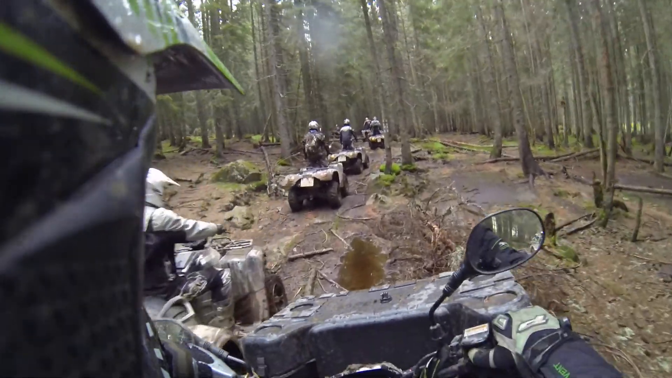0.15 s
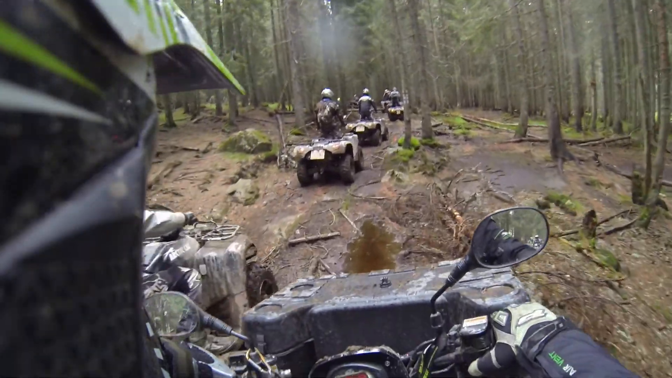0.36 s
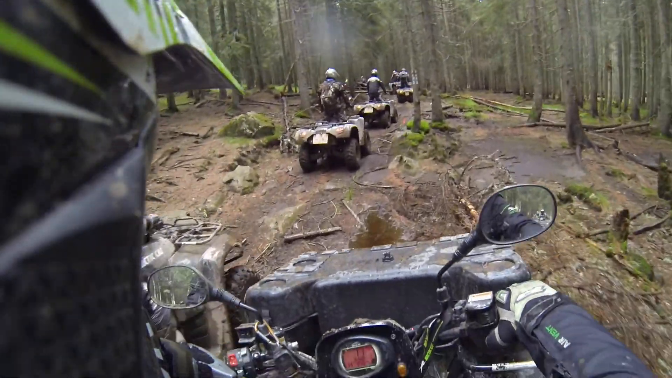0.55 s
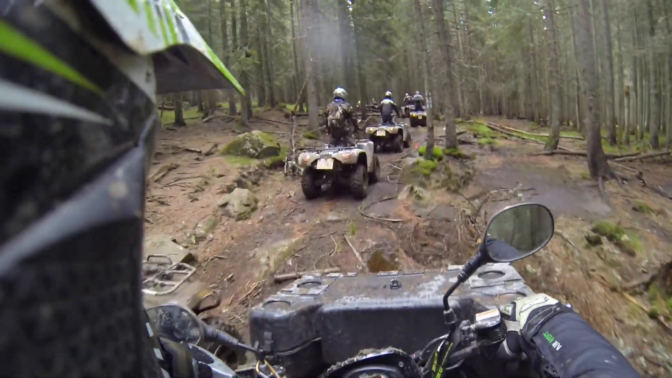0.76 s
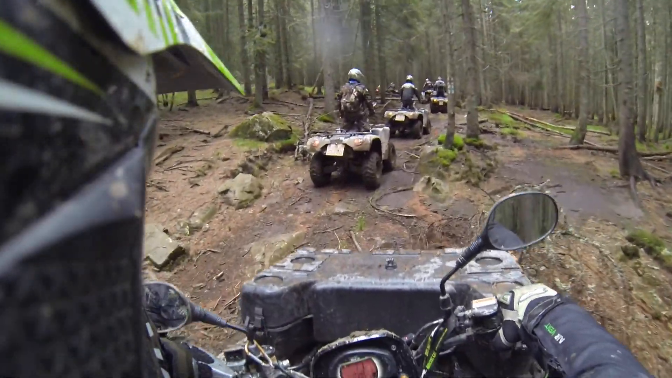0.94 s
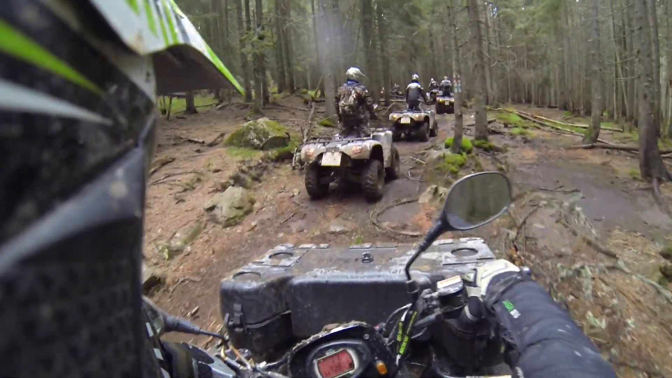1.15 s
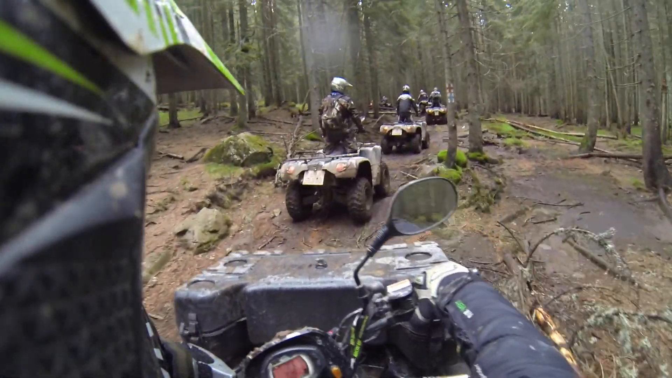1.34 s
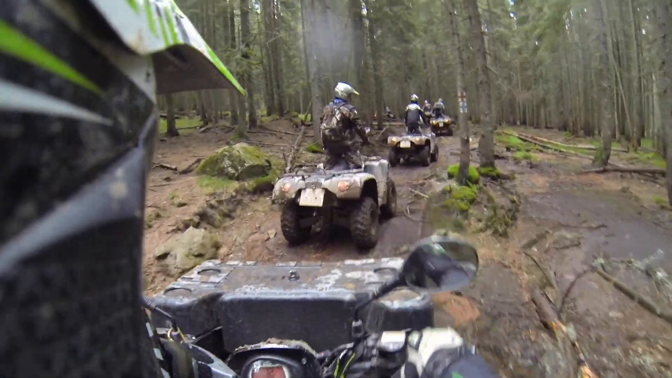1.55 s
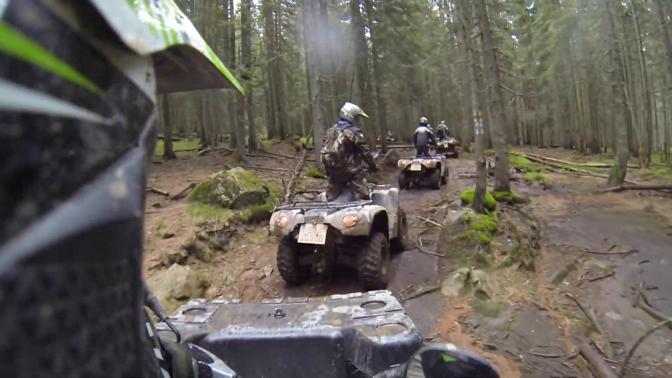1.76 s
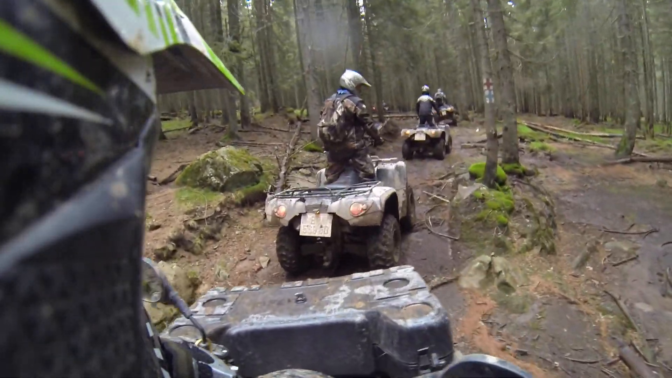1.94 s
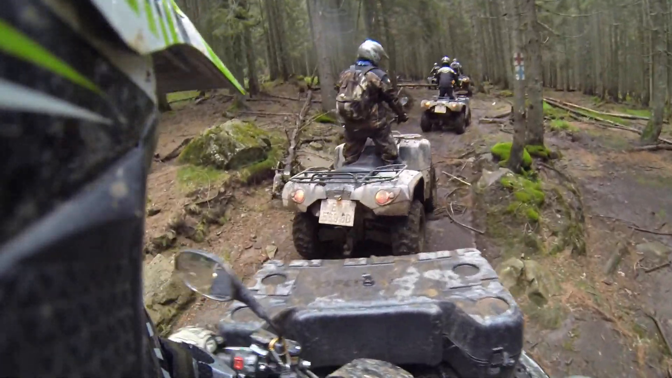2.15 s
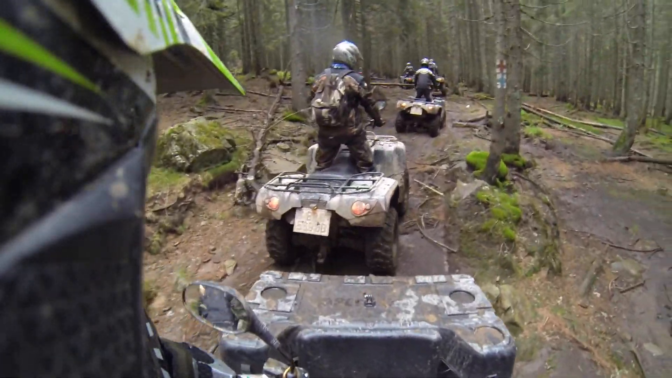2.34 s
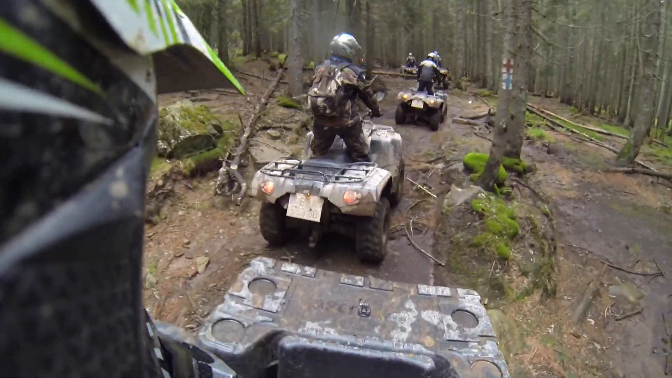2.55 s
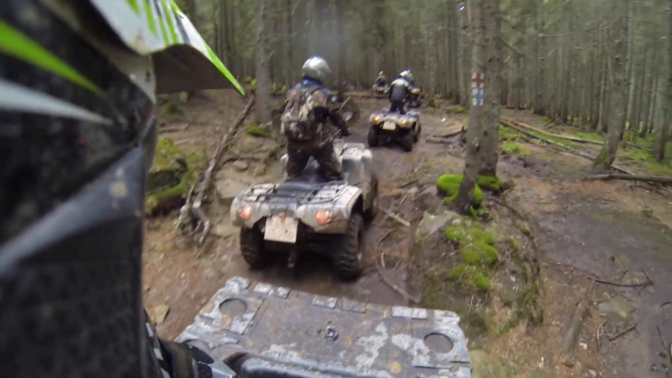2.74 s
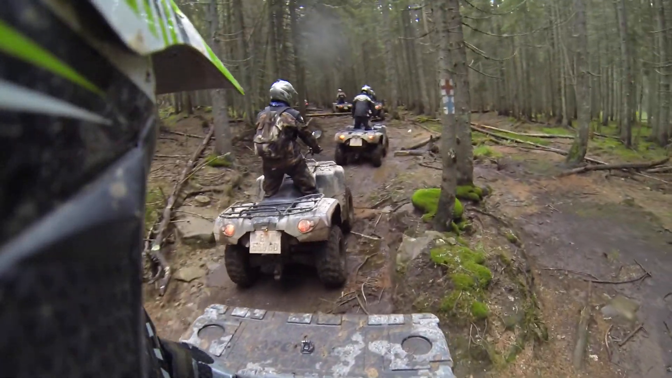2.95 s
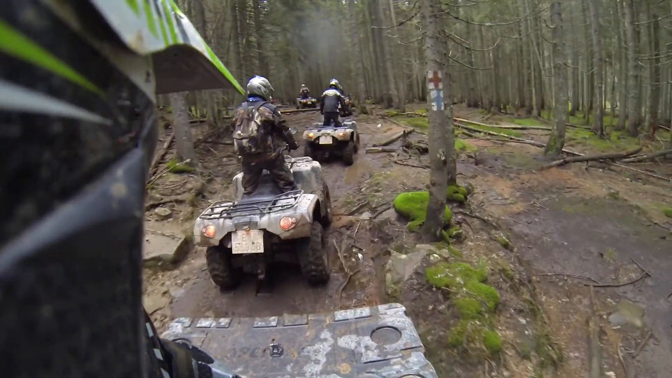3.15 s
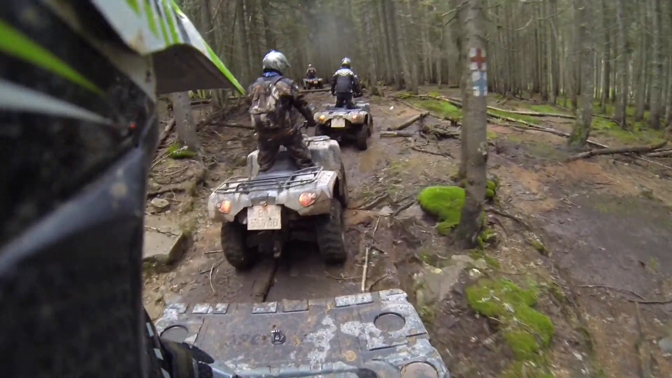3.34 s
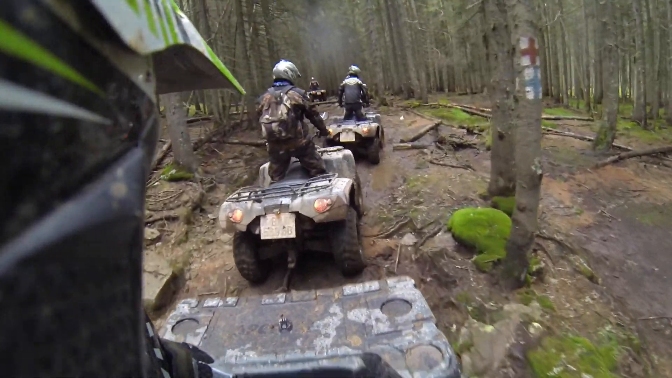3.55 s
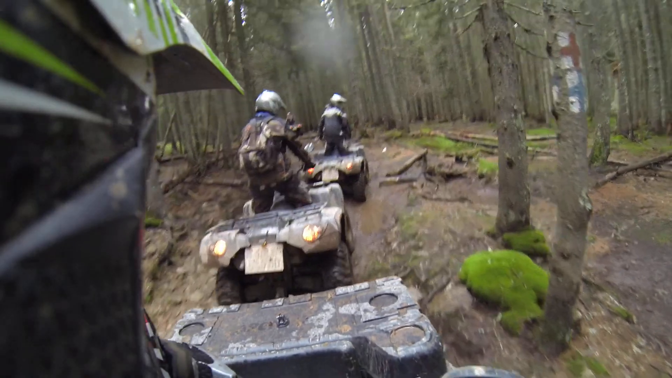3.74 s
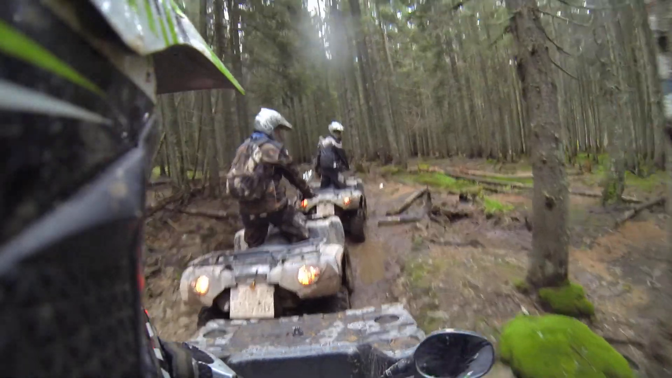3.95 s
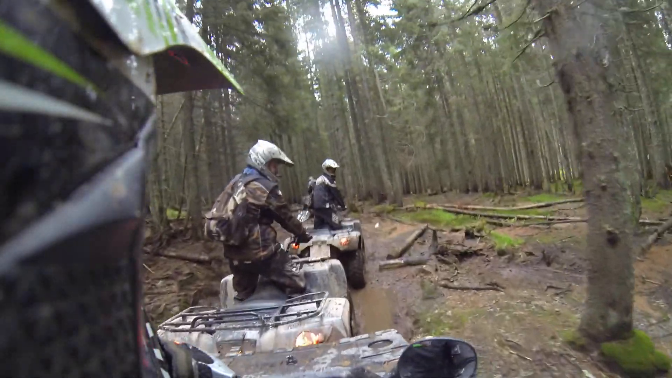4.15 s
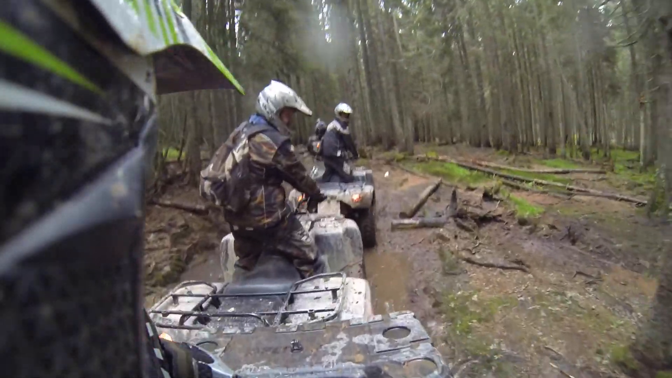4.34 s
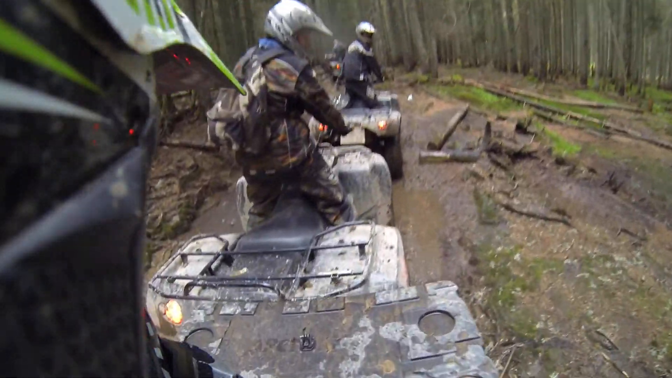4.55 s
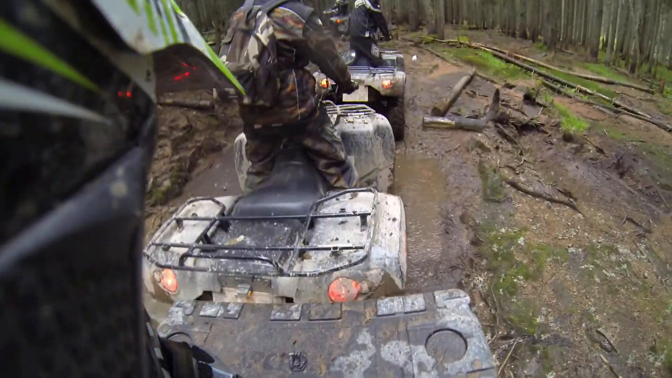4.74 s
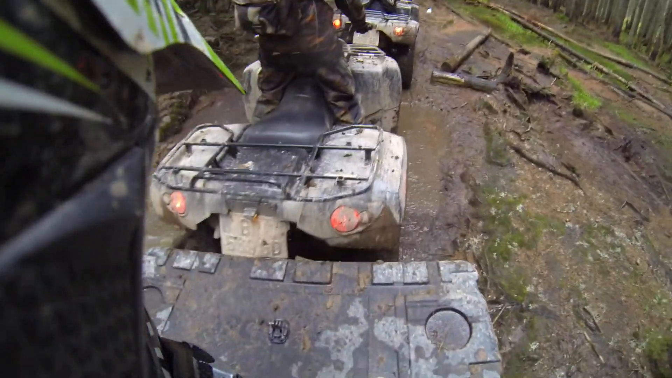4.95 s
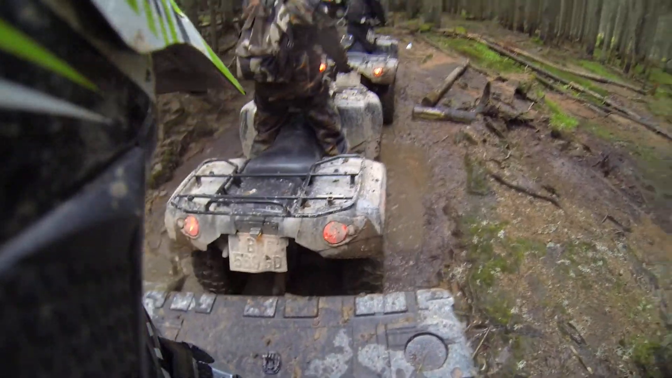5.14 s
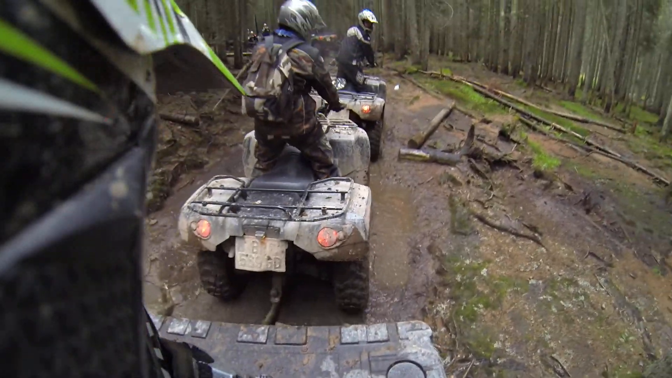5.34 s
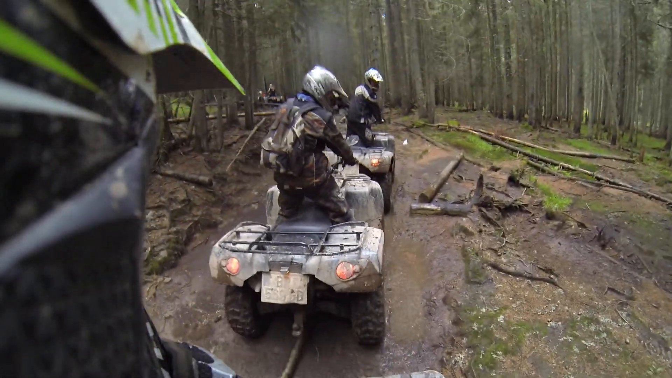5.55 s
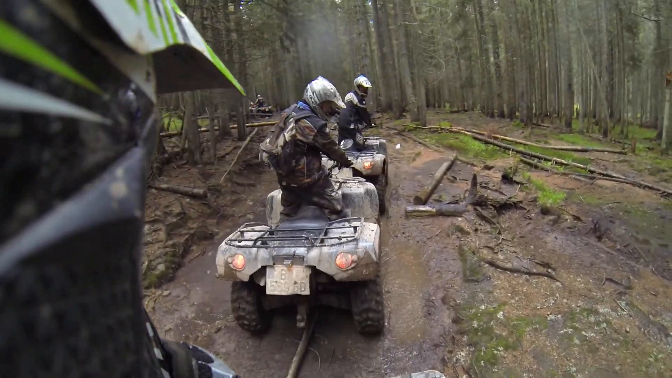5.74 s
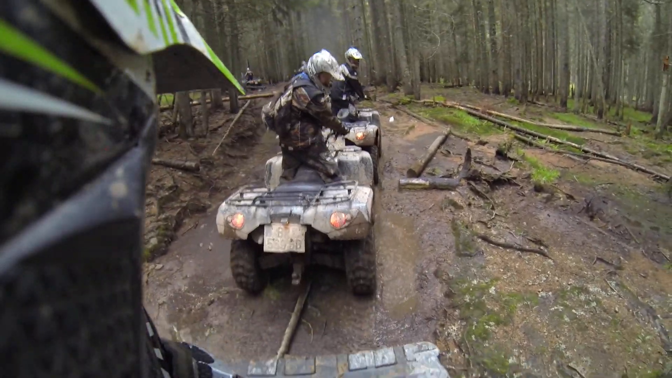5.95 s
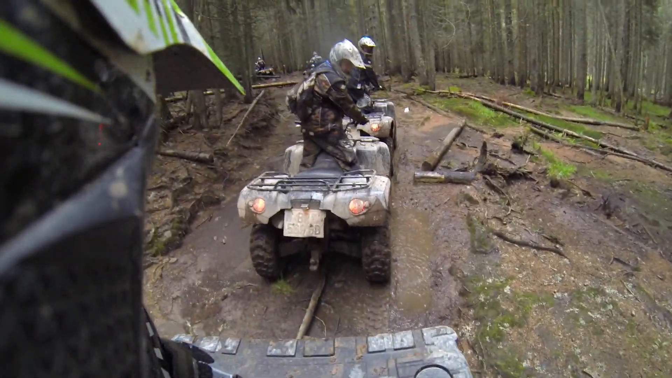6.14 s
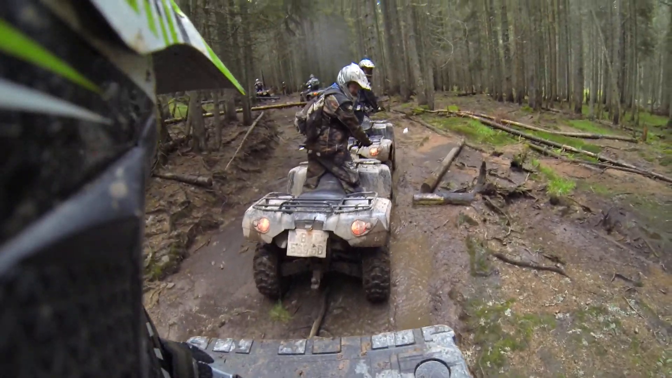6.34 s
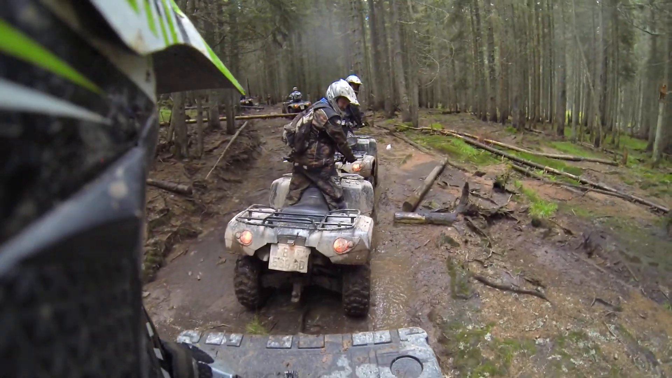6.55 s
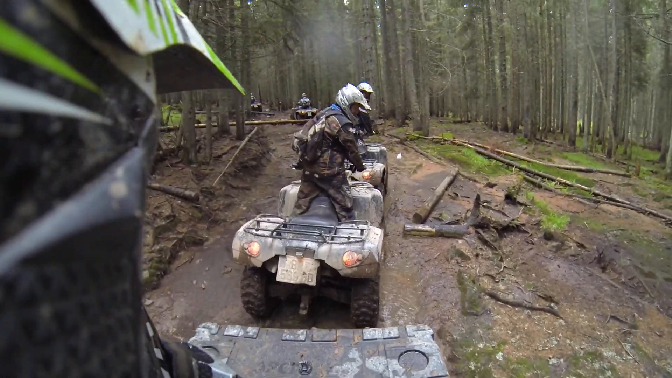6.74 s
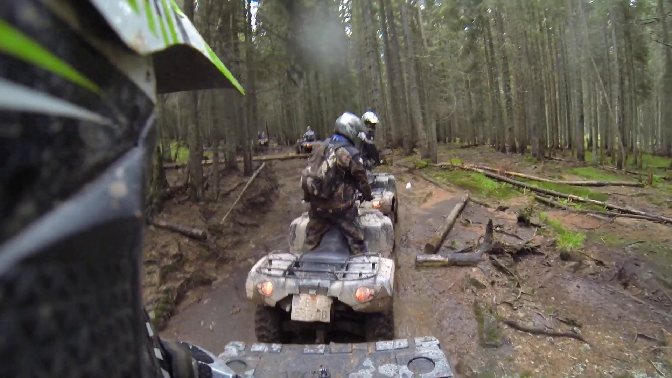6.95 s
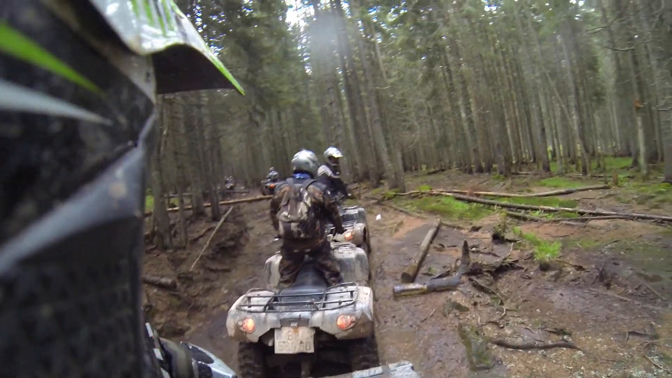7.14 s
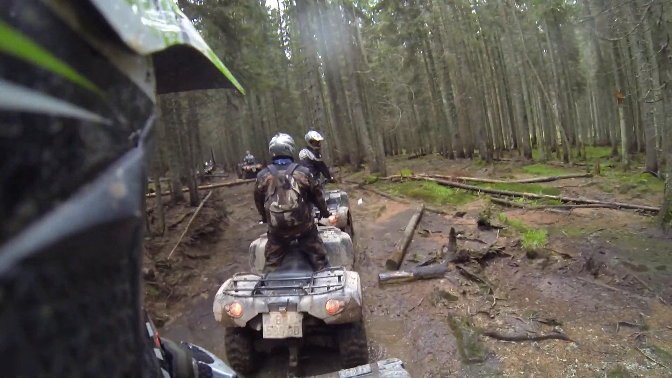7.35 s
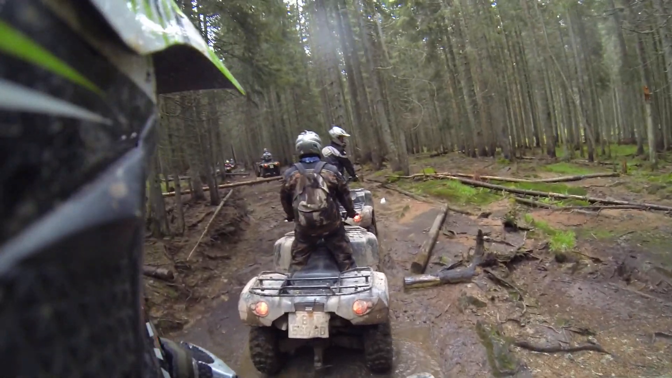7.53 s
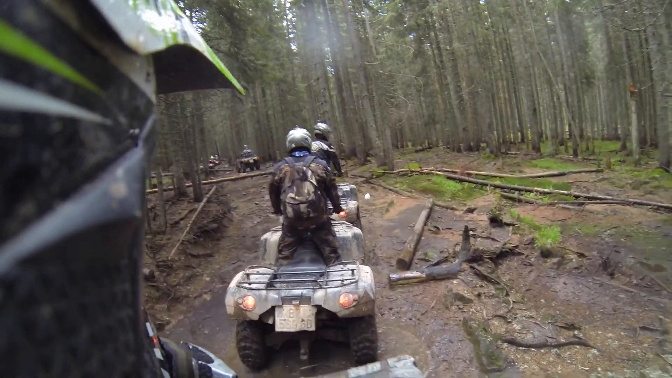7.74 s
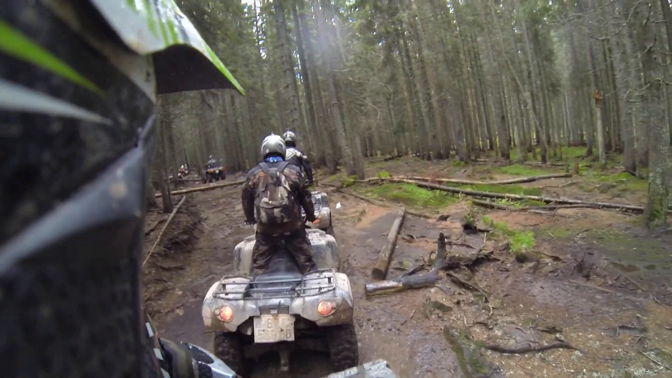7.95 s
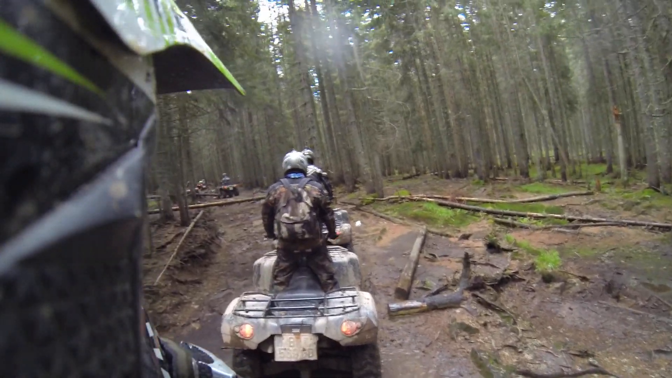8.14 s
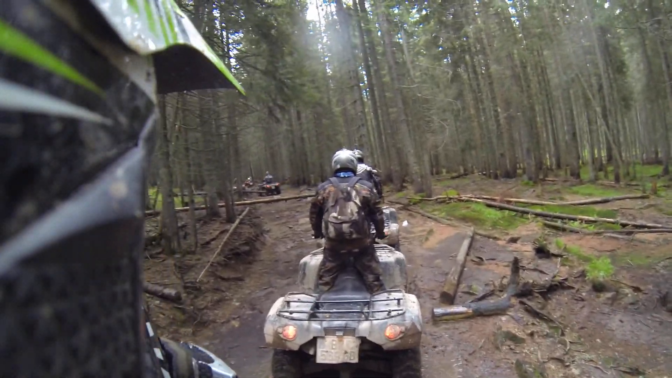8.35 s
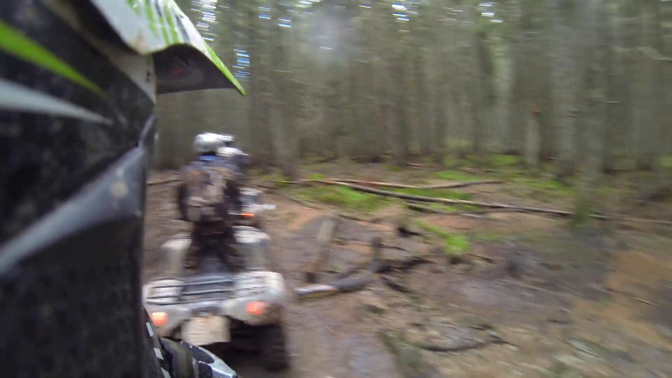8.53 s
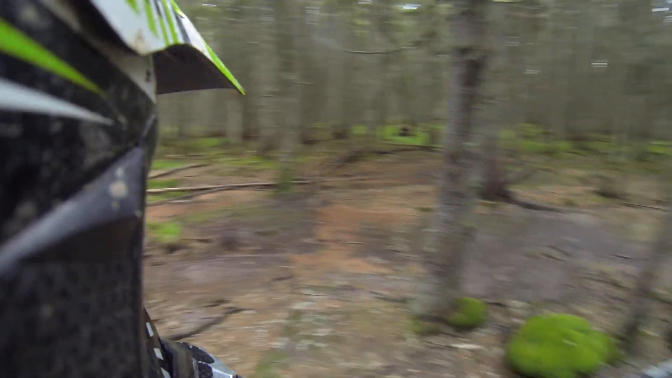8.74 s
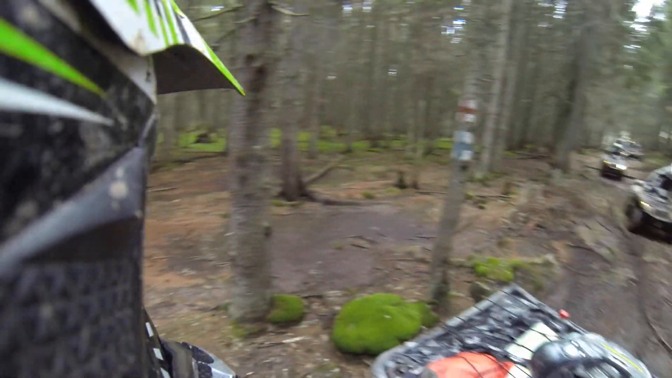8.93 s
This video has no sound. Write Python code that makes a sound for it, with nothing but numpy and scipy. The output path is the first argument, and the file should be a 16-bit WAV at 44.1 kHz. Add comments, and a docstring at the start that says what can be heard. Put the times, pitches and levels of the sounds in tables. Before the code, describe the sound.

A muddy woodland convoy heard through a cased helmet camera: a rough low engine chugs and swells, climbs in one strong pull, then falls quickly with a singing belt and deep rumble. It idles slowly, each firing audible, with gentle throttle blips. A very hard knock cracks at mid-way, smaller taps and thumps surround it, and the helmet padding rumbles with bumps at the end. Little echo.

```python
"""A single-cylinder quad bike crawls up a muddy forest trail in a convoy, heard at a cased camera on the helmet.
Each firing excites exhaust and mounts; filtered noise and taps make bark, clatter and hiss, sines the belt's song.
Through one long pull and several swells its speed and level change; judder, growls and squeals join in.
Knocks ring the case's decaying modes, low swings thump and sway the helmet, short noise bursts rattle.
Behind lie a low rumble, other engines as filtered pulse trains, and sines for faint whines and a thin whistle."""
import sys
import numpy as np
from scipy import signal
from scipy.fft import rfft, irfft
from scipy.io import wavfile
from scipy.ndimage import uniform_filter1d, map_coordinates

SR = 44100
rng = np.random.default_rng(int(sys.argv[2]) if len(sys.argv) > 2 else 0)


def file_out(sig):
    """Save sig as 16-bit WAV at sys.argv[1]."""
    # one column per channel
    cols = np.atleast_2d(sig).T
    # limit, then scale
    lim = np.clip(cols, -1, 1)
    pcm = np.round(lim * 32767).astype(np.int16)
    wavfile.write(sys.argv[1], SR, pcm)


N = 400869

# Engine speed before the swells add to it: (time [s], firing rate [Hz])
ENGINE_SPEED = [(0, 21.4), (.45, 21.2), (1.3, 22.8), (1.85, 22.4), (2.05, 24.3), (2.3, 25.4), (2.5, 32.2),
                (2.6, 35.6), (2.748, 41.1), (2.864, 45), (3.008, 49), (3.172, 51.9), (3.356, 52.5),
                (3.45, 52.1), (3.65, 49.2), (3.75, 42.8), (3.9, 34.8), (4.05, 27), (4.22, 20.5),
                (4.4, 16.5), (5, 14), (6.1, 14.1), (6.9, 15.5), (9.09, 15.6)]
# Swells of engine sound, some with a rise in speed, and a passing neighbour: (peak time [s], rise [s], fall [s],
# added firing rate [Hz], extra clatter [dB], extra exhaust [dB], extra hiss [dB])
ENGINE_SWELLS = [(.18, .5, 0.73, 0, 3.5, 0.5, 2), (0.999, 0.63, 0.36, 2.5, 3.5, 7, 0),
                 (1.482, 0.49, 0.31, 2, 5, 9.5, 2), (2.24, 0.16, 0.53, 0, 4.5, 7.5, 7),
                 (3.55, 0.24, 0.28, 0, 4.5, 2, -2), (3.66, 0.4, 0.13, 0.5, -0.5, -2, 4),
                 (4.08, 0.42, 1, 0, 4, 5, 5), (4.85, 0.15, 0.65, 0, 3.5, 9, 4),
                 (6.051, .58, 0.56, 10, 0, 3, 0.5), (6.67, 0.46, .45, 5, 0.5, 4.5, 0.5),
                 (7.58, 0.43, 0.33, 9, 0, 6.5, 0), (8.151, 0.17, 0.33, 1.5, 3, 1, 1),
                 (8.76, 0.35, 0.21, 3, 7, 3.5, -0.5)]
# Growth laws with engine speed: (level where the clutch bites [dB], slope [dB/octave],
# further slope once the clutch pulls [dB/octave])
THUD_LAW = (-39.5, 5.6, -5)
BARK_LAW = (-51, 6.4, 6.07)
CLATTER_LAW = (-39, 9.2, 7.5)
HISS_LAW = (-53, 5.9, 10.65)
RUMBLE_LAW = (-35.5, -1.8, 9.4)
# Spectra of the exhaust thud and bark, engine clatter and gas hiss: (frequency [Hz], relative level [dB])
THUD_SPECTRUM = [(10, -21.5), (22, -2), (45, 4.5), (65, -11), (85, -2.5), (103, -3), (130, -12), (200, -26),
                 (400, -76)]
BARK_SPECTRUM = [(70, -36), (150, -6.5), (210, 8.5), (255, 2.5), (305, -0.5), (360, -.5), (470, -1),
                 (575, 1), (625, -8.5), (690, -4.5), (780, -8), (880, 3.5), (950, -13), (1060, -21.5),
                 (2000, -30)]
CLATTER_SPECTRUM = [(250, -75), (660, -10.5), (880, -3.5), (1060, -14), (1170, 1.5), (1250, -0.5),
                    (1370, 7.5), (1480, 5), (1580, 5.5), (1690, -2), (1790, -.5), (1880, -11.5),
                    (2450, -11.5), (4200, -38)]
HISS_SPECTRUM = [(1200, -4), (2500, 6), (3300, 0.5), (3900, 1.5), (4400, -4.5), (5050, -3.5), (5800, -11.5),
                 (6800, -16), (7900, -15.5), (9500, -26), (11000, -24.5), (13300, -35), (15000, -33)]
# Exhaust note under load: (multiple of the firing rate [1], relative level [dB])
PIPE_ORDERS = [(1, -8), (2, 2.5), (3, -13), (4, -3.5), (5, -10.5), (6, -11.5), (7, -11), (8, -7.5),
               (9, -13), (10, -11), (11, -10), (12, -16), (14, -20), (15, -20), (16, -18), (17, -16),
               (18, -20)]
# Exhaust note, which drops as the throttle shuts: (time [s], level [dB])
PIPE_LEVEL = [(.5, -54), (1, -47), (1.5, -50), (1.85, -57), (2.3, -42), (2.6, -33), (2.85, -28),
              (3.2, -26.5), (3.66, -24.5), (3.75, -33.5), (4, -45), (4.4, -70)]
# Narrow pipe resonances: (centre [Hz], half-width [octaves], lift [dB])
PIPE_RESONANCES = [(251, 0.052, 8.5), (870, 0.057, 8)]
# Rocking that reaches the helmet: (time [s], level [dB])
ROCKING_LEVEL = [(0, -34), (2, -46), (2.28, -25), (2.6, -27), (3.6, -38), (4.15, -17.5), (4.5, -28),
                 (5, -30.5), (5.4, -33), (5.7, -27.5), (6.05, -15), (6.5, -28), (6.95, -30), (7.3, -32.5),
                 (7.65, -16), (8, -28), (8.45, -32.5), (9.09, -24.5)]
# Drive belt's upper pitch, sinking as the throttle closes: (time [s], frequency [Hz], level [dB])
BELT_SONG = [(2.9, 1480, -75), (3.25, 1561, -42), (3.41, 1553, -20), (3.455, 1570, -21),
             (3.48, 1620, -15.5), (3.53, 1545, -16), (3.585, 1548, -19), (3.63, 1500, -26),
             (3.68, 1465, -21), (3.715, 1380, -21.5), (3.76, 1290, -28), (3.8, 1185, -29),
             (3.88, 1120, -50)]
# Drive judder: (start [s], duration [s], relative shake level [dB], relative chug level [dB])
JUDDERS = [(.16, .01, -28, -60), (.183, .01, -30, -60), (.816, .1, -27, -45), (1.341, .01, -27, -50),
           (1.441, .01, -27, -50), (2.009, .14, -28, -42), (5.661, .01, -32, -40), (5.719, .01, -28.5, -38),
           (5.772, .07, -29, -35), (5.868, .25, -28, -31), (7.062, .01, -37, -50)]
CHUG_SPECTRUM = [(120, -9), (230, 9.5), (400, 3.5), (520, -13), (800, -20)]  # (frequency [Hz], relative level [dB])
# Intake growls, probably of the air box: (peak time [s], rise [s], fall [s], centre [Hz], level [dB])
GROWLS = [(2.222, 0.096, 0.38, 229.7, -37), (2.55, 0.49, 0.32, 359, -35), (3.93, 0.2, 0.22, 344, -43.5),
          (5.95, 0.23, 0.61, 308, -51), (7.55, 0.16, 0.2, 448, -45.5), (8.8, 0.11, 0.086, 545, -47)]
# Squeals, probably of a slipping belt: (peak time [s], rise [s], fall [s], frequency at the peak time [Hz],
# glide [Hz/s], level [dB])
SQUEALS = [(.16, 0.078, 0.11, 1396, -9, -34), (.27, 0.11, 0.24, 1494, 2.5, -39.5),
           (.88, 0.27, 0.51, 1388, 1, -38), (1.459, 0.068, 0.19, 1475, -300, -35),
           (2.18, 0.087, 0.14, 1347, 0, -37), (3.92, 0.041, .22, 1639, -400, -37),
           (3.97, 0.06, .13, 1840, -550, -36.5), (4.24, 0.036, 0.068, 1545, -1000, -40.5),
           (4.28, 0.092, 0.054, 1426, -400, -30), (6.101, 0.2, 0.18, 1405, -200, -36.5),
           (6.52, 0.48, 0.67, 1176, 0.5, -43), (8.63, 0.045, 0.083, 1370, 396, -41),
           (8.735, .06, 0.086, 1493, 702, -32), (8.82, 0.067, 0.17, 1480, -700, -39.5)]
# Knocks on the case: (time [s], level of the ringing's peak [dB], extra weight of the low modes [dB])
KNOCKS = [(1.1303, -15, 6), (3.046, -14, 0), (4.637, -24.5, 9), (4.714, -28, 0), (4.814, -28, 0),
          (4.838, -25, 0), (5.114, -29, 3), (5.279, -30, 0), (5.3412, 0, 1), (5.5995, -19.5, 8),
          (7.285, -29, 8), (8.793, -30, 14)]
# Modes of the case: (nominal frequency [Hz], relative level [dB], 60 dB decay time [s])
CASE_MODES = [(128, -12.5, 0.07), (190, -28, 0.29), (329, -21, 0.19), (440, -17, 0.1), (737, -15.5, 0.092),
              (847, -20.5, 0.15), (1200, 0.5, 0.046), (1380, 14.5, 0.017), (1465, 7.5, 0.024),
              (1927, 17.5, 0.0077), (2980, 0, 0.014)]
# Spectra of a knock's crack and its clack: (frequency [Hz], relative level [dB])
CRACK_SPECTRUM = [(500, -4), (3000, 0), (5500, 0), (9000, -13), (14000, -16)]
CLACK_SPECTRUM = [(200, -4), (400, -8), (900, -6), (1800, 7), (4000, -21)]
# Thumps and sways of the helmet, one with a knock: (time [s], thump level [dB],
# nominal thump frequency [Hz], thump duration [s], sway level [dB])
THUMPS = [(0.43, -32, 150, 0.033, -27), (0.634, -46, 130, 0.016, -23.5), (1.131, -20, 377, 0.0038, -34),
          (1.535, -21, 237, 0.048, -19), (1.566, -40, 150, 0.011, -24), (1.998, -29, 166, 0.01, -43),
          (4.479, -24.5, 189, 0.0091, -19.5), (4.903, -21.5, 199.5, 0.01, -15.5),
          (8.784, -19.5, 156, 0.0236, -14.5), (8.819, -21.5, 132, 0.028, -24),
          (8.85, -16.5, 90, 0.0257, -38), (8.886, -29, 190, 0.027, -40), (8.922, -21, 150, 0.022, -41)]
# Helmet shifting on its padding as the head turns: (peak time [s], rise [s], fall [s], level [dB])
PADDING_SHIFTS = [(8.86, 0.23, 0.94, -34.5)]
PADDING_SPECTRUM = [  # (frequency [Hz], relative level [dB])
    (60, 2.5), (110, -0.5), (165, -1.5), (240, -13.0), (450, -21.0), (900, -27)]
# Rattles, and the bright grit of some knocks: (start [s], duration [s], relative level [dB])
RATTLES = [(0.085, .01, -42.5), (1.1295, .01, -49), (1.2022, .01, -50), (1.558, .01, -41.5),
           (1.965, .23, -43), (4.46, .01, -37.5), (4.593, .01, -50), (4.839, .01, -45.5), (5.602, .01, -49),
           (6.625, .12, -48), (7.803, .01, -56)]
GRIT_SPECTRUM = [  # (frequency [Hz], relative level [dB])
    (900, -42), (1450, -10), (2000, 15.0), (4000, 12.5), (5200, 10.5), (6600, -4.0),
    (8000, -4.0), (10000, -10.0), (14000, -18)]
# Swells of low rumble on the helmet, from air and rocking: (peak time [s], rise [s], fall [s], extra level [dB])
RUMBLE_SWELLS = [(4.22, 0.78, 0.67, 18), (6.3, 0.34, 1, 4.5), (7.8, 0.52, 0.45, 1.5),
                 (8.85, 0.33, 0.76, 8.5)]
# Spectra of the low rumble and of the other quads: (frequency [Hz], relative level [dB])
RUMBLE_SPECTRUM = [(6, -18.5), (14, 11), (28, 0.5), (50, -3), (90, -20.5), (160, -46.5), (400, -40),
                   (1000, -76)]
CONVOY_SPECTRUM = [(30, -30.5), (60, -3), (92, -3), (135, -10), (190, -13.5), (240, -12.5), (310, -17.5),
                   (620, -28), (1000, -35), (1250, -24.5), (1500, -24), (4000, -65)]
# Whine of a small motor, perhaps the fuel pump: (peak time [s], rise [s], fall [s], level [dB])
PUMP_SWELLS = [(4.45, 0.4, 0.82, -58.5), (7.5, 0.55, 2.7, -57.5)]
# Drone of a quad further up the trail: (peak time [s], rise [s], fall [s], level [dB])
DRONE_SWELLS = [(1.2, 1.3, 0.96, -58), (6.5, 2.3, 1.44, -54), (8.6, 1.06, 0.8, -48)]
# Thin electronic whistle: (frequency [Hz], rms level [dB])
WHISTLE_LINES = [(10645, -81.5), (10693, -91), (13187, -91)]

CLUTCH_HZ = 25  # firing rate at which the clutch bites
CHUG_DEPTH = 0.7  # how hard each firing shakes the loose parts at low revs
THUD_DB_PER_HZ = 0.21  # a swell that raises the speed also deepens the thud
THUD_SHARE = 0.13  # of the exhaust's extra dB
# mount resonance, and strength of the second swing in each firing
ROCK_HZ, ROCK_WIDTH_OCTAVES, ROCK_SKEW = 30, 0.55, 0.78
# silencer's lowest resonance
BOOM_HZ, BOOM_WIDTH_OCTAVES, BOOM_DB = 98.5, 0.52, -41.5
BOOM_DB_PER_OCTAVE, BOOM_SHARE = 9.5, 0.59  # growth with speed; share of the exhaust's extra dB
OVERRUN_DB, OVERRUN_HZ_PER_S = 11, 117  # extra boom while the engine slows this fast
CHUG_LAG_S = 0.0166  # the exhaust chugs this long after each shake
# second contact of a knock: delay, level after a 0 dB knock, share of the knock's dB
REBOUND_S, REBOUND_DB, REBOUND_SHARE = 0.007, -15, 0.56
SWAY_HZ, SWAY_S, SWAY_LAG_S = 48.5, 0.042, 0.0057
THUMP_GLIDE = 0.7  # fraction by which a thump starts below its pitch
PUMP_HZ = 549
DRONE_HZ, DRONE_HZ_PER_S = 217, 2.4
TOP_HZ = 14400


def drive():
    """Superposed swells: firing rate, firing count, and extra clatter, exhaust, hiss and thud in dB."""
    rows = [np.outer(extra, swell(s, rise, fall)) for s, rise, fall, *extra in ENGINE_SWELLS]
    added_hz, clatter_db, exhaust_db, hiss_db = sum(rows)
    hz = uniform_filter1d(curves(ENGINE_SPEED)[0], size=SR // 12) + added_hz
    # the flywheel runs more evenly at high speed
    unevenness = .011 * (1.1 - hz / hz.max()) * walk(25)
    cycle = np.cumsum(hz * (1 + unevenness)) / SR
    thud_db = THUD_SHARE * exhaust_db + THUD_DB_PER_HZ * added_hz
    return hz, cycle, (clatter_db, exhaust_db, hiss_db, thud_db)


def engine(hz, cycle, clatter_db, exhaust_db, hiss_db, thud_db):
    """Periodic excitation: firings thud and bark in the exhaust, with valve clatter and gas hiss in step."""
    revs = hz / hz.max()
    puff = np.exp(-(cycle % 1) / .35)
    parts = (thud(hz, cycle, revs, thud_db) + rocking(hz, cycle) + boom(hz, cycle, exhaust_db)
             + exhaust_note(hz, cycle) + bark(hz, revs, puff, exhaust_db))
    parts = parts + clatter(hz, cycle, revs, puff, clatter_db) + hiss(hz, puff, hiss_db)
    return parts + belt(cycle, revs)


def thud(hz, cycle, revs, thud_db):
    """Pulse excitation: each firing, and the piston's return stroke, drives the low exhaust resonances."""
    firings = strokes(cycle, scatter_db=1.0)
    # the piston turns round twice a cycle, which lifts the even lines at speed
    return_stroke = revs ** 2 * strokes(cycle + .5, scatter_db=2.0)
    pulses = even(colour(firings + 0.66 * return_stroke, THUD_SPECTRUM))
    return pulses * loudness(hz, THUD_LAW) * undb(thud_db)


def bark(hz, revs, puff, exhaust_db):
    """Modulated flow noise: gas leaves the pipe in puffs that stand further apart when slow."""
    gas = noise() * (1 + 3.5 * (1 - revs) * puff)
    return even(colour(gas, BARK_SPECTRUM)) * loudness(hz, BARK_LAW) * undb(exhaust_db)


def clatter(hz, cycle, revs, puff, clatter_db):
    """Impact excitation: four valve events a cycle, and random taps of chain and clutch, ring the engine."""
    firings = strokes(cycle, scatter_db=1.0)
    valves = even(colour(strokes(4 * cycle, scatter_db=0.0) + 0.081 * firings, CLATTER_SPECTRUM))
    # about 900 random taps a second over a steady rustle
    taps = (rng.random(N) < 900 / SR) * noise() + 0.26 * noise()
    shaken = even(colour(taps * (1 + CHUG_DEPTH * (1 - revs) * puff), CLATTER_SPECTRUM))
    out = even(0.57 * revs * valves + shaken) * loudness(hz, CLATTER_LAW) * undb(clatter_db)
    # the clatter flutters as the machine shakes
    out = out * undb(1.0 * walk(70))
    # the clatter steps back while the belt sings
    return out / (1 + 2.5 * undb(curves(BELT_SONG)[1]))


def hiss(hz, puff, hiss_db):
    """Turbulent noise: gas hisses steadily, stronger just after each firing."""
    gas = noise() * (1.66 + puff) * undb(0.6 * walk(45))
    return even(colour(gas, HISS_SPECTRUM)) * loudness(hz, HISS_LAW) * undb(hiss_db)


def exhaust_note(hz, cycle):
    """Harmonic series filtered by pipe resonances; each line swells, fades and flutters on its own."""
    lines = 0
    for k, db in PIPE_ORDERS:
        lift_db = sum(peak_db * resonance(k * hz, centre, width) for centre, width, peak_db in PIPE_RESONANCES)
        level = undb(db + lift_db + 1.8 * walk(14))
        lines = lines + level * np.sin(2 * np.pi * (k * cycle + rng.random()) + .03 * k * walk(30))
    return even(lines) * undb(curves(PIPE_LEVEL)[0] + 1.0 * walk(60))


def boom(hz, cycle, exhaust_db):
    """Resonance: firing multiples 3 to 6 swell as they glide through the silencer's, more on the overrun."""
    lines = 0
    for k, db in ((3, -4), (4, 0), (5, 2.5), (6, -3)):
        line = undb(db + 2.5 * walk(11)) * np.sin(2 * np.pi * k * cycle + .6 * walk(6))
        lines = lines + line * resonance(k * hz, BOOM_HZ, BOOM_WIDTH_OCTAVES) ** 2
    overrun = np.clip(-np.gradient(hz) * SR / OVERRUN_HZ_PER_S, 0, 1)
    speed_db = BOOM_DB_PER_OCTAVE * np.log2(hz / CLUTCH_HZ)
    return lines * undb(BOOM_DB + speed_db + BOOM_SHARE * exhaust_db + OVERRUN_DB * overrun)


def rocking(hz, cycle):
    """Forced vibration: swings once and twice a firing, each stronger the nearer it is to the mount resonance."""
    once = np.cos(2 * np.pi * cycle) * resonance(hz, ROCK_HZ, ROCK_WIDTH_OCTAVES)
    twice = np.cos(4 * np.pi * cycle) * resonance(2 * hz, ROCK_HZ, ROCK_WIDTH_OCTAVES)
    return (once + ROCK_SKEW * twice) * undb(curves(ROCKING_LEVEL)[0] + 2.2 * walk(8))


def belt(cycle, revs):
    """Frictional vibration: the belt sings on two pitches, slipping a little; a gear hums in step with firings."""
    hz, db = curves(BELT_SONG)
    turns = np.cumsum(hz) / SR
    upper = np.sin(2 * np.pi * turns + .7 * walk(55)) * undb(2 * walk(60))
    lower = np.sin(2 * np.pi * .885 * turns + 1.2 * walk(55)) * undb(2 * walk(60))
    gear = np.sin(2 * np.pi * 16.9 * cycle + .9 * walk(40))
    return (upper + undb(-7) * lower) * undb(db) + gear * revs ** 10 * undb(-31)


def judder(cycle):
    """Repeated impacts: the drive shakes loose parts as it takes up, each shake followed by a low exhaust chug."""
    shake_rows = [(s, length, db) for s, length, db, _ in JUDDERS]
    chug_rows = [(s + CHUG_LAG_S, length, db) for s, length, _, db in JUDDERS]
    shakes = bursts(shake_rows, cycle, decay_s=0.0075, rise_s=0.001)
    chugs = bursts(chug_rows, cycle, decay_s=0.009, rise_s=0.002)
    hollow = unit(colour(noise(), CHUG_SPECTRUM))
    return unit(colour(noise(), CLATTER_SPECTRUM)) * shakes + hollow * chugs * undb(-1.0)


def growls(cycle, skirt_db=-26):
    """Cavity resonance: one rough gulp of air a cycle sounds a broad, hollow band."""
    pulses = even(smear(strokes(cycle, scatter_db=2.0), lag_s=.06))
    gulps = .6 * pulses + noise() * (1 + .4 * np.cos(2 * np.pi * cycle))
    out = 0
    for s, rise, fall, hz, db in GROWLS:
        hollow = even(colour(gulps, [(hz / 2, skirt_db), (hz, 0), (hz * 2, skirt_db)]))
        out = out + hollow * undb(db) * swell(s, rise, fall)
    return out


def squeals():
    """Frequency-modulated tones: rough strands waver and glide in and out of the clatter."""
    t = np.arange(N) / SR
    out = 0
    for s, rise, fall, hz, glide, db in SQUEALS:
        rough_hz = (hz + glide * (t - s)) * (1 + .022 * walk(170))
        out = out + wavering(rough_hz, waver=.011) * undb(db) * swell(s, rise, fall)
    return out


def knocks():
    """Impact and rebound: each knock on the case is followed by one second contact."""
    out = np.zeros(N)
    for s, db, weight_db in KNOCKS:
        add(out, s, knock(db, weight_db))
        add(out, s + REBOUND_S, knock(REBOUND_DB + REBOUND_SHARE * db, weight_db))
    return out


def knock(db, weight_db, rise_s=0.00066):
    """Modal ringing of the case; weight favours its low modes, and harder knocks its top mode."""
    t = np.arange(SR // 5) / SR
    ring = 0
    for hz, mode_db, t60 in CASE_MODES:
        fade = undb(mode_db + weight_db * (hz < 1000) + db / 2 * (hz > 2500) - 60 * t / t60)
        ring = ring + fade * np.sin(2 * np.pi * hz * (1 + 0.031 * rng.standard_normal()) * t)
    # a gentle contact builds up more slowly
    ring = ring * (1 - np.exp(-(t / (rise_s * (2.5 - db / 20))) ** 2))
    snap = noise(size=len(t)) * np.exp(-t / 0.00048)
    crack = undb(db / 3 - 21.5) * colour(snap, CRACK_SPECTRUM)
    clack = unit(colour(noise(size=len(t)), CLACK_SPECTRUM)) * np.exp(-t / 0.013) * undb(weight_db - 31.5)
    return undb(db) * (ring / np.abs(ring).max() + crack + clack)


def thumps():
    """Transient oscillation: each thump is followed by a sway; the helmet's padding rumbles as the head turns."""
    out = np.zeros(N)
    for s, thump_db, hz, length, sway_db in THUMPS:
        add(out, s, undb(thump_db) * swing(hz, length, THUMP_GLIDE))
        add(out, s + SWAY_LAG_S, undb(sway_db) * swing(SWAY_HZ, SWAY_S, 0))
    padding = even(colour(noise(), PADDING_SPECTRUM))
    return out + padding * swells(PADDING_SHIFTS)


def swing(hz, length, glide):
    """A brief, uneven oscillation; with glide it starts slow and settles near its pitch."""
    count = int(length * SR)
    wobble = np.interp(np.arange(count) / SR * 260, np.arange(64), noise(size=64))
    settling = glide * np.exp(-np.linspace(0, 4, count))
    phase = np.cumsum(hz * (1 - settling + .1 * wobble)) / SR
    return np.sin(2 * np.pi * phase) * signal.windows.tukey(count, .7)


def rattles(cycle):
    """Repeated contact: short gritty noise bursts, once a firing while they last; some brighten a knock."""
    grit = unit(colour(noise(), GRIT_SPECTRUM))
    return bursts(RATTLES, cycle, decay_s=0.008, rise_s=0.0017) * grit * undb(5.0)


def low_rumble(hz):
    """Low-frequency noise: air and rocking rumble on the helmet, varying with engine speed and in swells."""
    swell_db = sum(db * swell(s, rise, fall) for s, rise, fall, db in RUMBLE_SWELLS)
    rumble = even(colour(noise(), RUMBLE_SPECTRUM))
    return rumble * loudness(hz, RUMBLE_LAW) * undb(swell_db + 0.5 * walk(3.06))


def convoy():
    """Superposed pulse trains: three other engines mutter at low revs, each at its own drifting speed."""
    pulses = 0
    for hz in (19.5, 24.5, 30):
        cycle = np.cumsum(hz * (1 + 0.048 * walk(1.2))) / SR
        pulses = pulses + strokes(cycle, scatter_db=0.0)
    return unit(colour(unit(pulses) + 0.25 * noise(), CONVOY_SPECTRUM)) * undb(-44.0)


def whines():
    """Nearly pure tones: the pump, a far drone rising in pitch, and the camera's whistle over its own hiss."""
    t = np.arange(N) / SR
    whistle = 0
    for hz, db in WHISTLE_LINES:
        whistle = whistle + np.sqrt(2) * undb(db) * np.sin(2 * np.pi * hz * t + .4 * walk(15))
    pump = wavering(PUMP_HZ, waver=0.011) * swells(PUMP_SWELLS)
    drone = wavering(DRONE_HZ + DRONE_HZ_PER_S * t, waver=0.0296) * swells(DRONE_SWELLS)
    return pump + drone + whistle + undb(-73.0) * noise()


def loudness(hz, law):
    """Power law: gain changes with engine speed, with a further slope once the clutch pulls."""
    db, per_octave, pulling = law
    octaves = np.log2(hz / CLUTCH_HZ)
    return undb(db + per_octave * octaves + pulling * np.maximum(octaves, 0))


def resonance(hz, centre_hz, octaves):
    """Resonance curve: gain 1 at the centre, one half at the given distance in octaves."""
    return 1 / (1 + (np.log2(hz / centre_hz) / octaves) ** 2)


def strokes(turns, scatter_db):
    """Impulse train: one pulse, its strength scattered in dB, at each whole turn."""
    at = np.flatnonzero(np.diff(np.floor(turns)))
    out = np.zeros(N)
    out[at] = undb(scatter_db * noise(size=8192)[:len(at)])
    return out


def each_firing(cycle, s, length):
    """Periodicity: times one firing apart, from s for the given length."""
    t = np.arange(N) / SR
    first, last = np.interp([s, s + length], t, cycle)
    return np.interp(np.arange(first, last), cycle, t)


def bursts(table, cycle, decay_s, rise_s):
    """Exponential growth and decay: an envelope of short bursts, one a firing, for each table row."""
    out = np.zeros(N)
    t = np.arange(SR // 15) / SR
    for start, length, db in table:
        for s in each_firing(cycle, start, length):
            add(out, s, undb(db) * np.exp(-t / decay_s) * (1 - np.exp(-t / rise_s)))
    return out


def smear(x, lag_s):
    """Dispersion: pipe and bodywork spread each pulse in time, as every pitch has its own delay."""
    f = np.arange(N // 2 + 1) * SR / N
    lag = lag_s * np.interp(f, np.arange(0, 3000, 60), rng.random(50))
    # phase is the running sum of delay over frequency
    return irfft(rfft(x) * np.exp(-2j * np.pi * np.cumsum(lag) * SR / N), N)


def colour(x, points):
    """Minimum-phase filtering: a causal response through (frequency [Hz], level [dB]) points."""
    size = 2 ** 14
    hz, db = np.transpose(points)
    f = np.maximum(np.arange(size // 2 + 1) * SR / size, 1)
    # fall by 20 dB an octave outside the points
    beyond = np.maximum(np.log2(f / hz[-1]), 0) + np.maximum(np.log2(hz[0] / f), 0)
    response_db = np.interp(np.log(f), np.log(hz), db) - 20 * beyond
    # folding the cepstrum forward in time makes the response causal
    cepstrum = irfft(np.log(undb(response_db)))
    cepstrum[1:size // 2] *= 2
    cepstrum[size // 2 + 1:] = 0
    return signal.fftconvolve(x, irfft(np.exp(rfft(cepstrum))))[:len(x)]


def wavering(hz, waver):
    """Frequency and amplitude modulation: a sine that wavers in pitch and level."""
    turns = np.cumsum(hz * (1 + waver * walk(25))) / SR
    return np.sin(2 * np.pi * turns) * undb(3 * walk(9))


def walk(rate):
    """Random modulation: smooth chance with an rms of 1, through rate knots a second."""
    knots = noise(size=8192)
    return unit(map_coordinates(knots, [np.arange(N) / SR * rate], order=2, mode="wrap"))


def swell(s, rise, fall):
    """Raised-cosine envelope: a smooth rise to 1 at time s and a smooth fall."""
    ramp = np.interp(np.arange(N) / SR, [s - abs(rise), s, s + abs(fall)], [0, 1, 0])
    return np.sin(np.pi / 2 * ramp) ** 2


def swells(table):
    """Superposed envelopes: gain of (peak time [s], rise [s], fall [s], level [dB]) rows."""
    return sum(undb(db) * swell(s, rise, fall) for s, rise, fall, db in table)


def curves(table):
    """Linear interpolation: each column of a table, joined by straight lines in time."""
    s, *columns = np.transpose(table)
    return [np.interp(np.arange(N) / SR, s, c) for c in columns]


def undb(db):
    """Decibel definition: amplitude ratio of a level in dB."""
    return 10 ** (np.asarray(db) / 20)


def noise(size=N):
    """White noise: independent Gaussian samples."""
    return rng.standard_normal(size)


def unit(x):
    """Normalisation: scale to an overall rms of 1."""
    return x / np.sqrt(np.mean(x ** 2))


def even(x):
    """Normalisation: scale to a running rms of 1 over a quarter of a second."""
    return x / np.sqrt(uniform_filter1d(x ** 2, size=SR // 4) + 1e-18)


def add(out, s, sound):
    """Superposition: add a sound in place from time s."""
    start = int(s * SR)
    out[start:start + len(sound)] += sound[:len(out) - start]


def scene():
    """Superposition of the quad, the knocks, thumps and rattles, and the background."""
    hz, cycle, load = drive()
    quad = engine(hz, cycle, *load) + judder(cycle) + growls(cycle) + squeals()
    contacts = knocks() + thumps() + rattles(cycle)
    background = low_rumble(hz) + convoy() + whines()
    return (quad + contacts + background)[None]


def record(dry):
    """Low-pass filtering: the camera cuts the top steeply."""
    return signal.sosfilt(signal.ellip(6, .2, 70, TOP_HZ, fs=SR, output="sos"), dry)


dry = scene()
out = record(dry)
file_out(out)
```